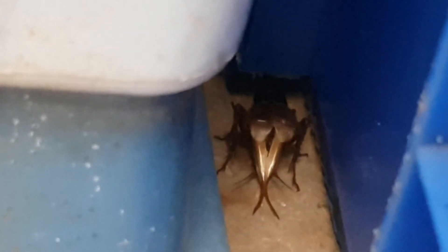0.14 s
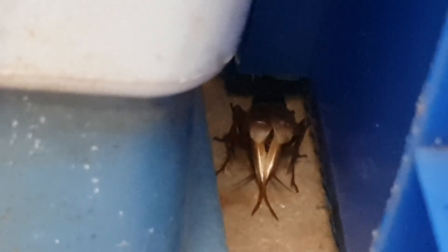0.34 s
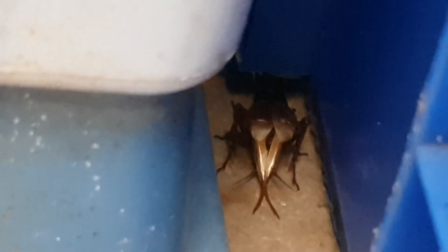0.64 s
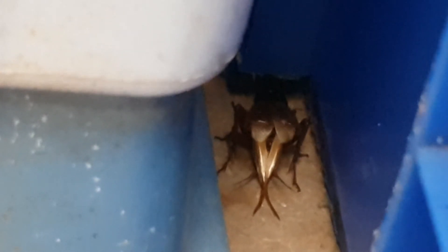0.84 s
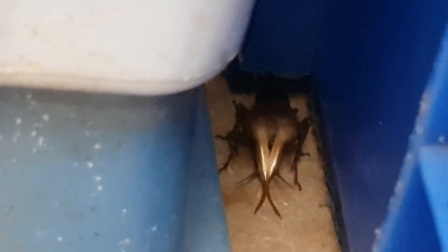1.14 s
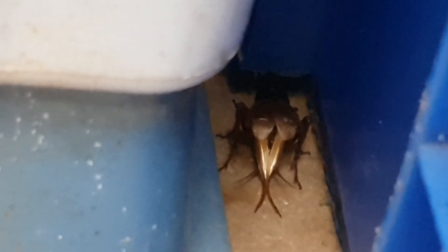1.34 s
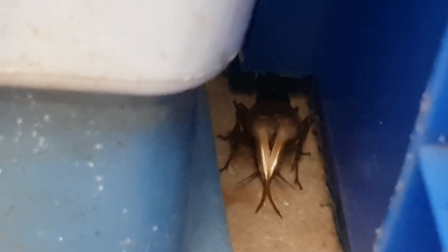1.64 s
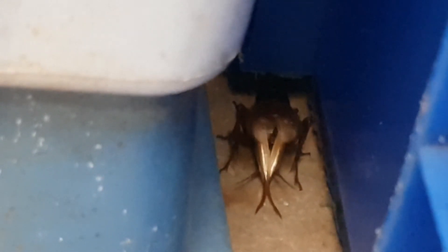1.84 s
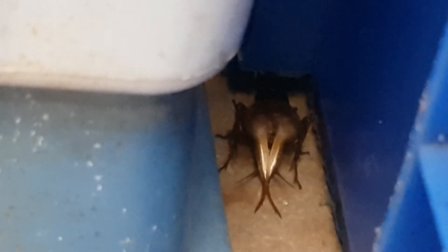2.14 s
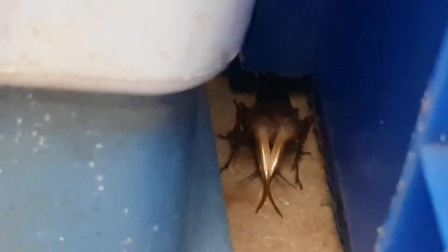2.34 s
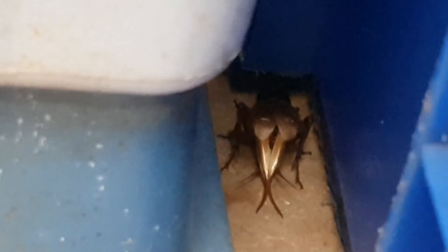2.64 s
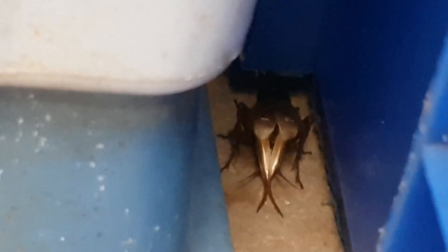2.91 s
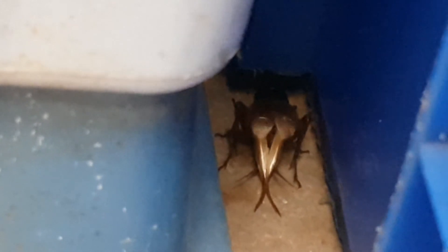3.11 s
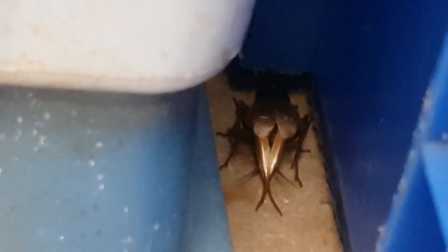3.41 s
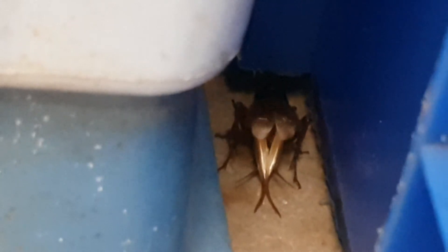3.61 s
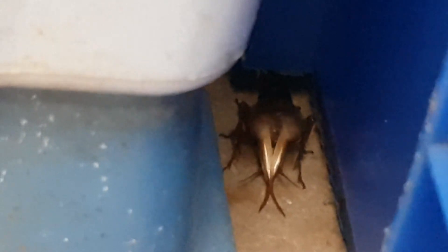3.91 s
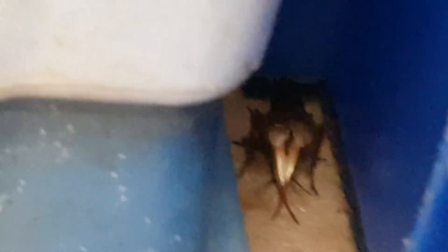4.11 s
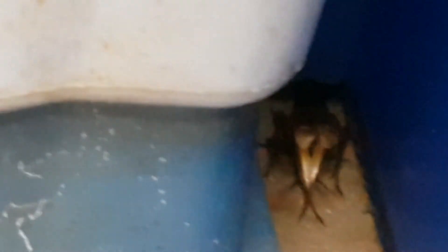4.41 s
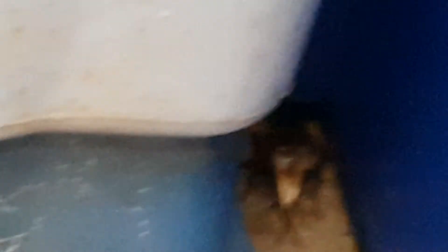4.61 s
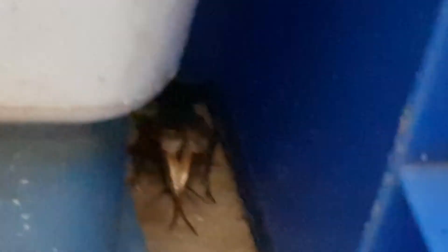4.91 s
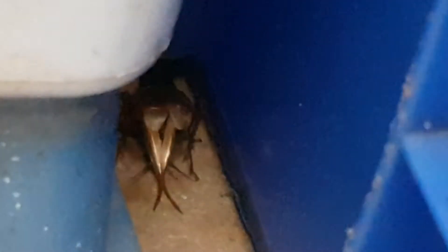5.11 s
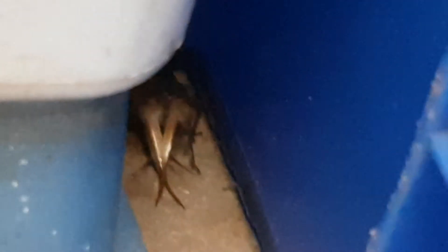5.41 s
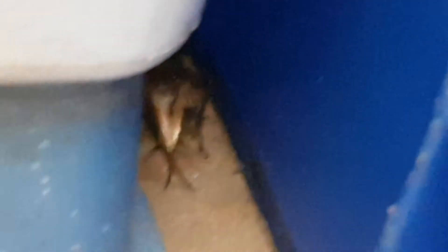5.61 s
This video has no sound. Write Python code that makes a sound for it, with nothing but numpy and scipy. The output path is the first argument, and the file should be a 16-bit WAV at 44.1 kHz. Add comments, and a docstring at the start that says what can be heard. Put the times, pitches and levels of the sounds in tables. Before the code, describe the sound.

A cricket chirps loudly at very close range indoors, high shrill trills about four a second, with a soft handling rustle near the end.

```python
"""From the start a field cricket sings in a plastic nook indoors, a hand's length from a phone.
Each wing closure drags a scraper along a toothed file: a falling 6 kHz tone, its octave and a dry rasp.
The nook's walls return every stroke and the room rings on, over steady air, a faint hum, a thin hiss
and soft far-off swells. From 4.28 s a hand rustles on the phone as it moves; the chirps from 4.7 s on
reach it by other paths, each chirp's slightly different as the hand sways."""
import sys
import numpy as np
from scipy import signal
from scipy.fft import rfft, irfft
from scipy.io import wavfile
from scipy.ndimage import uniform_filter1d, minimum_filter1d

SR = 44100
rng = np.random.default_rng(int(sys.argv[2]) if len(sys.argv) > 2 else 0)


def digitize_waveform(pressure):
    """Quantize a signal to 16-bit integers and store it at the path in sys.argv[1].

    Rows of a 2-D input are taken as channels; values are limited to [-1, 1].
    """
    field = np.atleast_2d(pressure).T
    bounded = np.clip(field, -1, 1)
    quanta = np.round(bounded * 32767).astype(np.int16)
    wavfile.write(sys.argv[1], SR, quanta)


N = 253575


def undb(db):
    """Decibels to gain."""
    return 10 ** (np.asarray(db) / 20)


def colour(x, points):
    """Filter a sound by a spectrum of (Hz, relative dB) points; white noise keeps its level."""
    hz, db = np.transpose(points)
    f = np.maximum(np.fft.rfftfreq(len(x), 1 / SR), 1)
    gain = undb(np.interp(np.log(f), np.log(hz), db))
    gain = gain / np.sqrt(np.mean(gain ** 2))
    return irfft(rfft(x) * gain, len(x))


def noise(points, size):
    """Noise of rms near 1 with a spectrum of (Hz, relative dB) points."""
    return colour(rng.standard_normal(size), points)


def band(hz, width, size):
    """Noise of rms near 1 in one narrow band, 3 dB down at the edges of its width (Hz)."""
    points = [(hz - 2 * width, -60), (hz - width / 2, -3), (hz, 0),
              (hz + width / 2, -3), (hz + 2 * width, -60)]
    return noise(points, size=size)


def walk(rate):
    """Slow random wander of spread 1, from a given number of random steps per second."""
    k = int(SR / rate)
    steps = np.repeat(rng.standard_normal(N // k + 1), k)
    x = uniform_filter1d(uniform_filter1d(steps, k), k)[:N]
    return x / x.std()


def add(track, start_s, x):
    """Mix a sound into a track at a given time."""
    i = int(np.clip(start_s * SR, 0, N))
    track[i:i + len(x)] += x[:N - i]


def cricket(chirps, octave_db, scatter_db=.3, jitter_s=.00015):
    """Bursts of two to four almost evenly spaced wing strokes."""
    stroke_gap_s = .02425
    song = np.zeros(N)
    # wings this small radiate almost nothing below their resonance
    small_wings = signal.butter(14, 4600, "high", fs=SR, output="sos")
    for start, count, db in chirps:
        count = int(round(count))
        for k in range(count):
            when = start + k * stroke_gap_s + jitter_s * rng.standard_normal()
            level = undb(db + scatter_db * rng.standard_normal())
            sound = level * stroke((k + 1) / count, octave_db)
            # silence after the stroke leaves room for the filter's ringing
            padded = np.pad(sound, (0, len(sound)))
            add(song, when, signal.sosfilt(small_wings, padded))
    return song


def stroke(wear, octave_db, octave_rough=0.28, rasp_db=-35, rasp_wear_db=4, rasp_scatter_db=2,
           grain_db=3, skid_db=-19, waver_hz=22):
    """One wing closure; the scraper rasps and skids more on the later strokes of a chirp (wear 0-1)."""
    # The wings' upper resonances. Each row: centre in Hz, width in Hz, level in dB.
    upper_wing = [(12430, 272, -0.5), (11840, 300, -8.5)]
    # Rasp of the teeth through the wing. Each row: frequency in Hz, relative level in dB.
    rasp_spectrum = [(2500, -58.5), (4200, -44.5), (4600, -7), (5000, 14), (5600, -23), (6700, -9.5),
                     (7200, -6.5), (7750, 9), (8450, -5.5), (10300, -9.5), (11400, -28), (12600, -11.5),
                     (13300, -2), (15800, -16.5)]
    # The scraper's skid, one row: mean pitch in Hz, pitch spread as a share, time to its peak in seconds,
    # latest start in seconds, level spread in dB.
    skid_habits = (6750, .035, .0006, .002, 3)
    # the scraper slows ever faster along the file, so the tooth rate falls by a power law
    stroke_s, tooth_hz, sag_hz, sag_power = .023, 6208, 1784, 2.654
    # the scraper bites, holds until hold_s after the start, then lets go
    attack_s, hold_s, release_db_per_s = .004, .01504, 7000

    t = np.arange(int(stroke_s * SR)) / SR
    hz = tooth_hz - sag_hz * (t / stroke_s) ** sag_power
    release = undb(-release_db_per_s * np.maximum(t - hold_s, 0))
    push = np.minimum(t / attack_s, 1) * release
    force = push * wings(hz)

    # uneven teeth make the rate waver, and no two strokes have quite the same speed
    uneven = noise([(500, 0), (1100, -20), (1800, -70)], size=len(t))
    rate = hz + waver_hz * uneven + 8 * rng.standard_normal()
    phase = 2 * np.pi * np.cumsum(rate) / SR

    # the octave flares through the upper resonances; it starts clean and roughens as the scraper slows
    flare = sum(undb(db) / (1 + (2 * (2 * hz - centre) / width) ** 2) ** .5
                for centre, width, db in upper_wing)
    slip = octave_rough * t / hold_s * noise([(700, 6.5), (2000, -23.5), (4000, -52.5)], size=len(t))
    octave = undb(octave_db) * flare * force ** (2 / 3) * np.sin(2 * phase + slip)
    tone = force * np.sin(phase) + octave

    # irregular tooth strikes ring the whole wing
    grit_db = rasp_db + rasp_wear_db * (wear - .5) + rasp_scatter_db * rng.standard_normal()
    grit = undb(grit_db + grain_db * uneven) * force ** (1 / 3)
    rasp = colour(grit * rng.standard_normal(len(t)), rasp_spectrum)

    # the scraper skids over the first teeth with a short, higher ping
    skid_hz, spread, peak_s, latest, spread_db = skid_habits
    since = np.maximum(t - rng.uniform(0, latest), 0)
    swell = (since / peak_s * np.exp(1 - since / peak_s)) ** 2
    ping = swell * np.sin(2 * np.pi * skid_hz * rng.normal(1, spread) * since)
    skid = wear * undb(skid_db + spread_db * rng.standard_normal()) * ping

    contact = signal.windows.tukey(len(t), .06)
    return contact * (tone + rasp + skid)


def wings(hz):
    """Gain of the wings at a given tooth rate: two resonances over a weak even radiation."""
    # The two resonances. Each row: centre in Hz, width in Hz, level in dB.
    resonances = [(6087, 292, .8), (5595, 414, 1.5)]
    base_db = -25.5
    peaks = sum(undb(db) / (1 + (2 * (hz - centre) / width) ** 2) ** 1.407
                for centre, width, db in resonances)
    return undb(base_db) + peaks


def nook(song, paths, size=4096):
    """Close reflections beat against the falling tone and cut each stroke into lobes."""
    khz = np.fft.rfftfreq(size, 1000 / SR)
    # one list of (ms, dB) for the left, one for the right
    ears = np.reshape(paths, (-1, 2, 2)).transpose(1, 0, 2)
    channels = []
    for ear in ears:
        response = sum(undb(db) * np.exp(-2j * np.pi * khz * ms) for ms, db in ear)
        # centred, so that delays between samples keep both sides of their pulse
        echo = np.roll(irfft(response, size), size // 2)
        channels.append(signal.oaconvolve(song, echo)[size // 2:size // 2 + N])
    return np.array(channels)


def swayed(paths):
    """The same paths, each a little longer or shorter as the hand sways."""
    sway_ms = .008
    paths = np.array(paths)
    paths[:, ::2] += sway_ms * rng.standard_normal((len(paths), 2))
    return paths


def room(song, db, t60, delay_s):
    """A diffuse echo that falls 60 dB in t60 seconds, unrelated in the two channels."""
    t = np.arange(SR) / SR
    decay = np.exp(-np.log(1000) * t / t60) * (t > delay_s)
    response = rng.standard_normal((2, SR)) * decay
    response *= undb(db) / np.sqrt(np.sum(response ** 2, axis=1, keepdims=True))
    return signal.fftconvolve(song[None], response, axes=1)[:, :N]


def handling(flutter_db=3):
    """An uneven rustle of the hand that swells and fades as the phone is moved."""
    # Each row: frequency in Hz, relative level in dB.
    rustle_spectrum = [(100, -10), (500, -3), (900, -15), (1250, -8), (2000, -5.5), (4000, -14.5),
                       (8000, -15)]
    start_s, attack_s, hold_s, release_s, level_db = 4.28, 0.11, 0.35, 0.81, -59
    corners = start_s + np.cumsum([0, attack_s, hold_s, release_s])
    motion = np.interp(np.arange(N) / SR, corners, [0, 1, 1, 0])
    level = undb(level_db + flutter_db * walk(20))
    return motion * level * np.array([noise(rustle_spectrum, size=N) for _ in range(2)])


def stirs(width_share=0.057, spread_db=2):
    """Soft swells of narrow-band sound from far off, diffuse between the channels."""
    # Each row: start in seconds, length in seconds, centre in Hz, width in Hz, level at the peak in dB.
    placed = [(0, 0.46, 2900, 900, -60.5), (.5, 0.096, 2500, 300, -58.5), (1.138, 0.22, 3160, 605, -54.5),
              (2.927, .18, 1040, 92, -59), (4.003, 0.51, 434, 51.5, -56.5)]
    # still fainter swells come at random
    count, low_hz, high_hz, length_s, mean_db = 16, 650, 3200, 0.27, -67.5
    swells = []
    for when, pitch, strength in rng.random((count, 3)):
        hz = low_hz * (high_hz / low_hz) ** pitch
        db = mean_db + spread_db * (2 * strength - 1)
        swells.append((when * N / SR, length_s, hz, width_share * hz, db))
    out = np.zeros((2, N))
    for start, length, hz, width, db in list(placed) + swells:
        size = int(length * SR)
        for channel in out:
            sound = band(hz, min(width, hz * .45), size=size)
            add(channel, start, undb(db) * np.hanning(size) * sound)
    return out


def background(air_db=-57.9, side_db=-3, hiss_db=-69, hum_db=-1, upper_db=-1, wander_db=1.77):
    """Steady room air, alike left and right in the bass, with a wavering hum and a thin hiss."""
    # Room air. Each row: frequency in Hz, relative level in dB.
    air_spectrum = [(15, -53), (25, -25), (64, -1), (133, 0), (243, -6), (270, -5), (349, -3), (372, 0),
                    (415, -3.5), (917, -15.5), (1160, -16.5), (1440, -18.5), (1780, -17), (2160, -14.5),
                    (4200, -17), (5460, -53.5), (9240, -120)]
    # Faint hum. Each row: centre in Hz, width in Hz, level in dB before hum_db is added.
    hum_bands = [(174.3, 6.4, -79), (302.6, 16, -72.5), (351.6, 2.8, -65), (704.6, 22, -73.5),
                 (1054, 97, -74)]

    mid = noise(air_spectrum, size=N)
    side_high = signal.butter(2, 520, "high", fs=SR, output="sos")
    side = signal.sosfilt(side_high, noise(air_spectrum, size=N))
    side = side + .3 * noise(air_spectrum, size=N)
    air = (mid + undb(side_db) * np.array([side, -side])) * undb(air_db)

    # the upper part of the air wanders in level
    upper_high = signal.butter(2, 1000, "high", fs=SR, output="sos")
    upper = signal.sosfiltfilt(upper_high, air)
    air = air + upper * (undb(upper_db + wander_db * walk(7.17)) - 1)

    hum = sum(undb(db + hum_db) * band(hz, width, size=N) for hz, width, db in hum_bands)
    hiss_spectrum = [(2000, -2), (4700, 4), (7000, 0), (15000, -5)]
    hiss = np.array([noise(hiss_spectrum, size=N) for _ in range(2)])
    return air + hum + undb(hiss_db + 1.5 * walk(5)) * hiss


def scene(first_db=1.16, moved_db=4.0):
    """The song heard from two places, the surroundings' quick echo and the room's longer ring."""
    # Each row: start in seconds, number of wing strokes, relative level in dB.
    chirps = [(.0013, 4, -1.5), (0.2241, 4, -1), (0.458, 2, -1.5), (0.9162, 4, -1), (1.136, 4, -1.5),
              (1.3942, 4, -1), (1.6407, 4, -0.9), (1.8698, 4, -1.4), (2.0952, 4, -2), (2.311, 4, -1.5),
              (2.5432, 4, -1), (2.7855, 4, -1.1), (3.012, 4, -1), (3.2335, 4, -0.5), (3.4539, 4, -1),
              (3.6755, 4, -1.5), (3.894, 4, -1.5), (4.1419, 3, -1), (4.519, 3, -2.5), (4.764, 4, -4),
              (4.9961, 4, -2.5), (5.2226, 4, -2.5), (5.4528, 4, -3), (5.673, 3, -1)]
    # Paths from wings to phone by way of the nook's walls, at the first place and after the move.
    # Each row: left delay in ms, left level in dB, right delay in ms, right level in dB,
    # the levels before first_db or moved_db is added.
    first_paths = [(.563, -9.5, .107, -14.1), (2.268, -3.7, 3.237, -7.6), (2.536, -4.2, 3.863, -18),
                   (10.173, -21.8, 5.926, -12.2), (10.819, -19.7, 8.765, -16)]
    moved_paths = [(.079, -9.5, 0, -9), (.527, -9.7, 2.818, -12.5), (2.406, -9.7, 5.501, -15.1),
                   (3.592, -15.6, 6.864, -18.9), (8.555, -18.7, 9.508, -19.1)]
    # Tone balance of the song as it feeds the room's echoes.
    # Each row: frequency in Hz, relative level in dB.
    echo_balance = [(4800, 0), (5300, -3.5), (5650, 2), (6050, -5), (6500, 10.5), (7800, 2), (12000, 2.5),
                    (15000, -16.5)]
    move_s = 4.7

    first = cricket([c for c in chirps if c[0] < move_s], octave_db=-23.5)
    moved = [cricket([c], octave_db=-21) for c in chirps if c[0] >= move_s]
    near_first = undb(first_db) * nook(first, first_paths)
    near_moved = undb(moved_db) * sum(nook(chirp, swayed(moved_paths)) for chirp in moved)

    echo_feed = colour(first + sum(moved), echo_balance)
    quick = room(echo_feed, db=-13.5, t60=0.078, delay_s=0.01)
    ring = room(echo_feed, db=-25.5, t60=0.66, delay_s=0.057)
    return near_first + near_moved + quick + ring + background() + stirs() + handling()


def record(dry, ceiling=1.0):
    """The phone's limiter eases any peak above full scale down to it; then the top is cut."""
    top_hz = 15950
    size = SR // 200  # 5 ms
    allowed = np.minimum(1, min(ceiling, 1) / (np.abs(dry).max(axis=0) + 1e-9))
    lowest = minimum_filter1d(allowed, 2 * size)
    gain = uniform_filter1d(uniform_filter1d(lowest, size), size)
    top_cut = signal.ellip(12, .2, 95, top_hz, fs=SR, output="sos")
    return signal.sosfilt(top_cut, dry * gain)


dry = scene()
out = record(dry)
digitize_waveform(out)
```